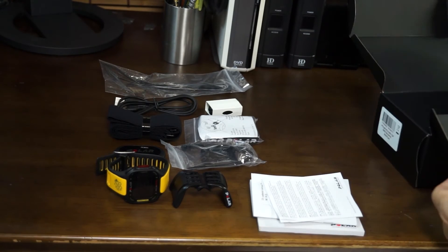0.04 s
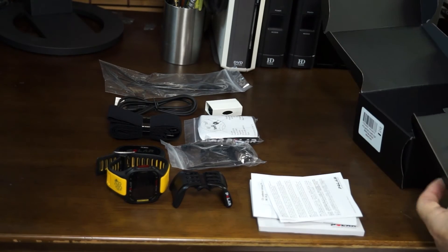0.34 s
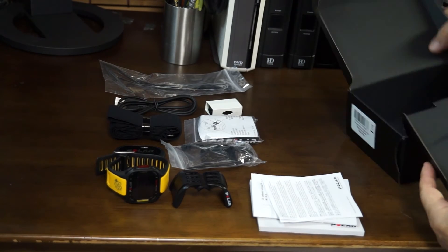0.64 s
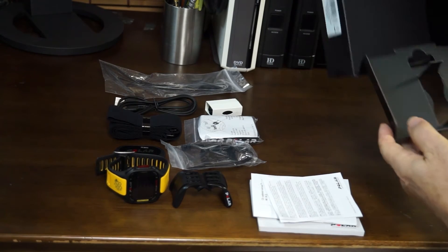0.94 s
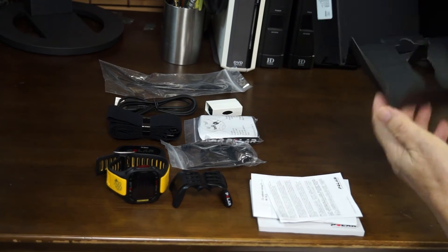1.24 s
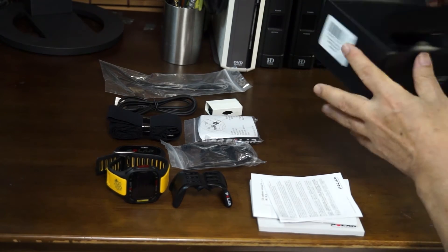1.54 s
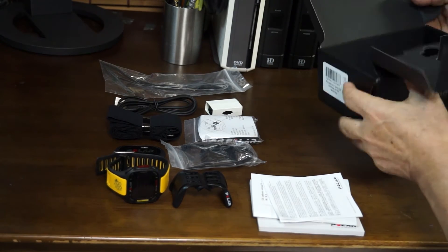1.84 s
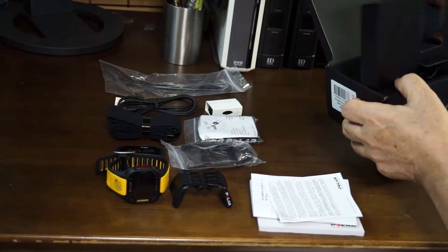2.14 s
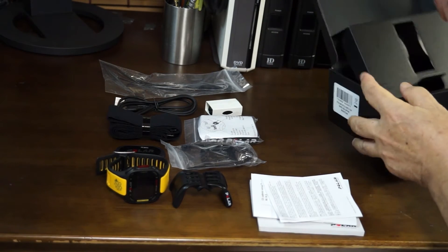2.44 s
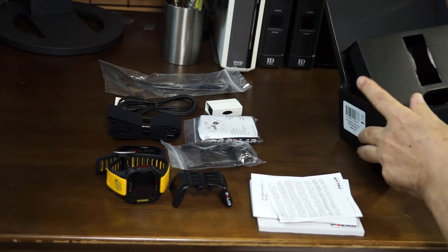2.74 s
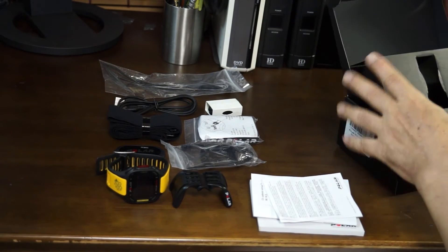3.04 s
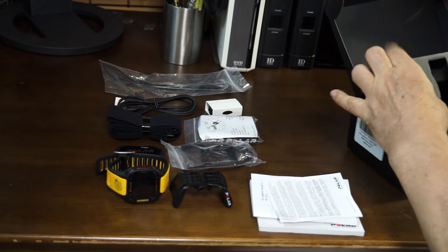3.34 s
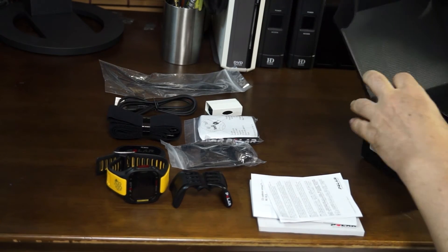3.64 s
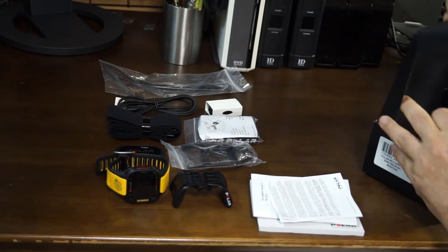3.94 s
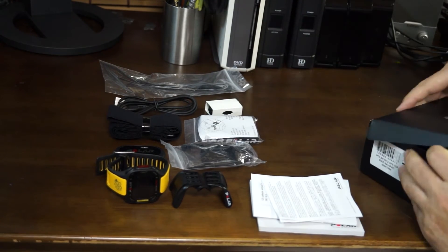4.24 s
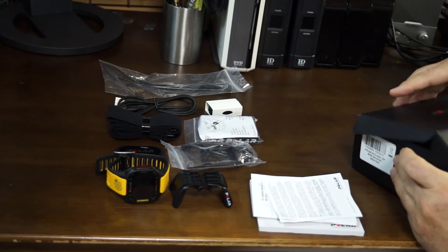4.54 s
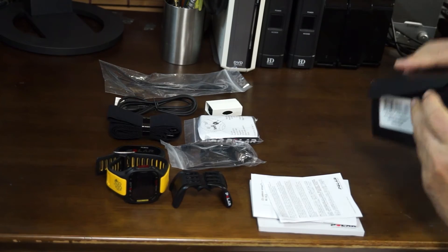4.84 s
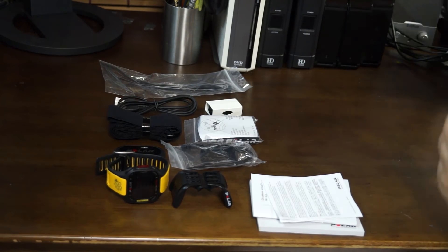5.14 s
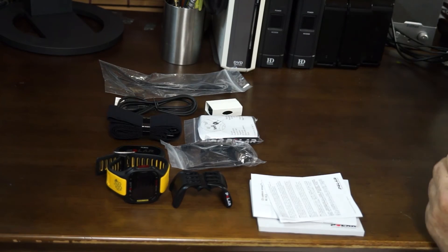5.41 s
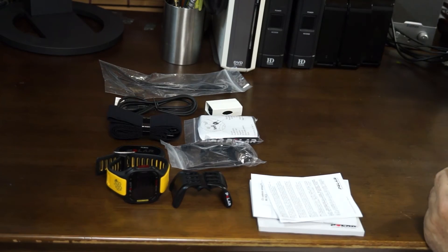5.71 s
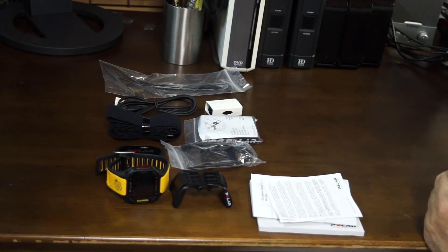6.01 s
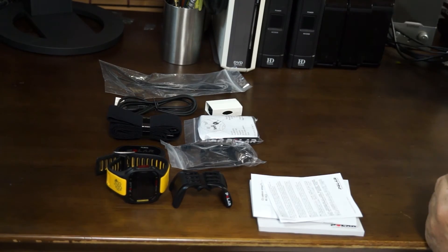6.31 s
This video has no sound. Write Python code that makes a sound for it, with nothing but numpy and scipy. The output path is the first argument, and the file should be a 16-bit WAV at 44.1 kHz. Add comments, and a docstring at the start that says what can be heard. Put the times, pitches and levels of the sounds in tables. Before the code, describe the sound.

Cardboard scrapes, taps and clicks as a box is packed with its insert and closed, followed by a soft slide with a brief squeak.

```python
"""Handling a cardboard box

Hands tilt a stiff box on a wooden desk, fit its insert back in, shut the lid and lift it away.
Impacts excite damped panel modes (knocks, snaps) and thump the desk; between them card and skin rub
in a stream of tiny slips. Last comes a soft slide with a short stick-slip hoot.
The room is small and dry; a close stereo microphone adds a faint hiss."""
import sys
import numpy as np
from scipy import signal
from scipy.fft import rfft, irfft, next_fast_len
from scipy.io import wavfile
from scipy.ndimage import map_coordinates

SR = 44100
rng = np.random.default_rng(int(sys.argv[2]) if len(sys.argv) > 2 else 0)


def master_out(mix):
    """Clip the mix to full scale and print it as 16-bit PCM to the path in sys.argv[1]."""
    frames = np.transpose(np.atleast_2d(mix))
    ceiling = np.clip(frames, -1, 1)
    pcm = np.round(ceiling * 32767).astype(np.int16)
    wavfile.write(sys.argv[1], SR, pcm)


N = 289718
TIME = np.arange(N) / SR

# room tone and microphone hiss: (frequency [Hz], spectral level [dB])
FLOOR_SPECTRUM = [(12, -32), (20, -4), (53, -13), (96, -6), (187, -7.5), (222, -2.5), (248, -8),
                  (422, -7.5), (459, -12.5), (574, -11.5), (1860, -23.5), (3250, -26), (3530, -25.5),
                  (16000, -30.5)]
# likeness of that noise in the two channels: (frequency [Hz], correlation [-1 to 1])
FLOOR_CORRELATION = [(30, .3), (130, -.4), (600, -0.37), (3000, 0), (7000, .3), (15000, .1)]
# card sliding on card, skin or desk:
# (start [s], duration [s], level [dB], pressure [dB], grit [dB], swell from start to end [dB])
RUB_STROKES = [(0.0, 0.19, -63, 2, -2.5, 4), (0.207, 0.076, -55.5, 1, 1, -0.5),
               (0.32, .18, -59, -3.5, -2.5, 0.5), (0.53, 0.049, -51.5, -6.5, -6, -1.5),
               (0.66, 0.13, -55.5, -1.5, -4.5, 13.5), (0.86, 0.09, -55.5, -5.5, -3.5, -3.5),
               (1.0, 0.061, -62, 0, 2, 3.5), (1.26, .16, -60, -2, -2, 8), (1.486, 0.015, -55.5, -8, -9, -6),
               (1.61, 0.17, -54, 1.5, -1, -9), (1.755, 0.18, -50.5, -5, -5.5, -13),
               (1.97, .08, -56.5, -4, 1, -9), (2.055, 0.1, -49.5, -7, -4.5, -8.5),
               (2.2, .19, -50, -5.5, -6, -3.5), (2.42, 0.28, -46.5, -4, -4.5, -5),
               (2.735, 0.048, -47, 1, 2, 4), (2.87, 0.14, -51.5, 6, 1, -6), (3.01, 0.15, -61.5, 5, 4, 6),
               (3.18, .13, -51, 7.5, -0.5, 2.5), (3.33, 0.12, -53.5, -0.5, -3.5, 11),
               (3.468, 0.16, -36.5, 2, -4, -0.5), (3.68, 0.19, -53.5, 0.5, -1.5, -0.5),
               (3.88, 0.32, -51, 3, -1.5, 1.5), (4.23, 0.21, -49.5, 1.5, -1.5, 10.5),
               (4.48, .12, -46.5, -4.5, -15, 2), (4.645, 0.12, -49.5, 6, -0.5, 3.5),
               (4.818, 0.17, -51.5, -3.5, -4.5, 11), (5.19, 0.13, -73, 8, 6, -8),
               (5.7, 0.073, -60, -0.5, -2, 7), (5.755, .13, -51.5, 1.5, -1, -0.5),
               (5.935, 0.16, -58.5, 3.5, -1, -9.5)]
# sliding friction: (frequency [Hz], spectral level [dB])
FRICTION_SPECTRUM = [(50, -7.5), (95, -19.5), (130, -8.5), (270, -8.5), (420, 4), (650, 1.5), (1000, -3),
                     (1600, -5), (2300, -4), (4000, -6.5), (5500, -9), (7500, -6), (10500, -9),
                     (13000, -15), (15500, -28.5)]
# resonances of box and desk: (frequency [Hz], level [dB])
MODES = [(128, -2), (195, 1), (255, -5.5), (310, -5.5), (357, 0.5), (400, 4.5), (463, 1), (545, 4),
         (624, 5), (709, 4.5), (830, 2), (899, 5), (1075, -26.5), (1150, -22), (1268, -23), (1380, 4),
         (1555, 7.5), (1790, 5), (1930, -25), (2288, -14.5), (2800, -5.5), (3750, -21)]
# panels and lid knock, and the desk takes their weight:
# (time [s], scuff time [ms], panel pitch [Hz], level [dB], hardness [dB], thump re level [dB])
PANEL_KNOCKS = [(0.028, 2, 350, -53, -6.5, 4.5), (0.242, 0.41, 369, -36, -10, -4),
                (0.272, 2.2, 315, -51, -17, 3), (0.412, 1.8, 516, -48.5, -5.5, 3.5),
                (0.63, .6, 880, -54.5, -7.5, -6), (0.693, 0.54, 371, -39.5, -36, -7.5),
                (0.799, 6.1, 381, -50.5, -5, -13), (1.607, 1.4, 656, -38.5, -6, -19),
                (1.699, 0.66, 656, -39.5, -3, -12), (1.728, 0.76, 666, -36, -8.5, -22),
                (2.081, 1.1, 640, -48, -14, -14), (2.716, 1.1, 590, -43, -8, -25),
                (2.764, 1.1, 426, -22, -12, -5.5), (2.874, 13, 624, -41.5, -6, -29),
                (2.923, 0.84, 787, -25.5, -10.5, -4.5), (2.936, 3.5, 890, -28.5, -6.5, -15),
                (2.951, 0.4, 429, -26, -5.5, -7), (3.116, 1.3, 520, -46, -16, -5.5),
                (3.177, 2.5, 485, -43.5, -3, -10), (3.214, 0.94, 352, -40, -5.5, -9),
                (3.283, 3, 595, -32, -5, -12), (3.297, 3.2, 423, -39, -8, -17),
                (3.476, 0.8, 920, -34.5, -10, -32), (3.626, 1.5, 450, -29.5, -0.5, -22),
                (3.638, 0.58, 864, -19, -5, -18.5), (3.644, 0.19, 429, -18.5, -2, -17.5),
                (3.673, 8.6, 1020, -33, -3, -26), (3.761, 0.6, 433, -36, -11, -16),
                (3.804, 0.52, 581, -29.5, -3, -18.5), (3.899, 7.6, 376, -36.5, -12, -7.5),
                (3.954, 0.96, 678, -35.5, -14, -12), (4.003, .53, 425, -41.5, -5, -9),
                (4.071, 1.4, 502, -36, -6.5, -9), (4.088, 0.94, 413, -31, -27, -5.5),
                (4.139, 2, 620, -40, -10.5, -22), (4.239, 0.36, 450, -39, -4, -9),
                (4.612, 4.1, 417, -34, -12, -15), (4.64, 0.89, 406, -48.5, -4, 9.5),
                (4.718, 0.38, 432, -30, -11, -1.5), (4.722, 0.81, 132, -41.5, -20, 10.5),
                (4.826, 1, 592, -53, -13, -10), (5.673, 3.2, 490, -55.5, -14.5, -24),
                (5.82, 4.5, 559, -44.5, -5.5, -10)]
# card edges catch and flick free: (time [s], panel pitch [Hz], level [dB], brightness [dB])
EDGE_SNAPS = [(0.243, 357, -48, 5), (1.244, 660, -60, 2), (1.314, 357, -64, 7.5), (1.366, 581, -47, -1.5),
              (1.689, 705, -42, 1), (1.88, 655, -44.5, 2), (1.908, 337, -45, 4.5), (1.933, 366, -44.5, 1.5),
              (2.001, 339, -57, 7.5), (2.194, 1030, -48.5, 6), (2.246, 660, -56.5, -7),
              (2.352, 769, -57.5, 10), (2.397, 365, -31.5, -4.5), (2.402, 349, -27, 0.5),
              (2.492, 1280, -44, -1.5), (2.546, 1250, -44.5, -1.5), (2.612, 1220, -41.5, -3.5),
              (2.952, 800, -36, -4.5), (3.262, 600, -49.5, 9.5), (3.525, 463, -43.5, 8.5),
              (3.555, 620, -38, 1.5), (3.58, 616, -35, 4), (4.225, 444, -47.5, -0.5),
              (4.288, 430, -43.5, 1), (4.473, 564, -45, -1), (4.765, 560, -54, -6), (4.872, 547, -46, -0.5),
              (4.889, 456, -42, -1.5), (4.92, 466, -39, -4.5), (4.951, 524, -38.5, -1),
              (4.996, 584, -48.5, -3), (5.087, 530, -60, -0.5)]
# the crowd of short-lived panel modes: (frequency [Hz], spectral level [dB])
PANEL_SPECTRUM = [(60, -35.5), (98, -24.5), (130, 2), (270, -11), (400, 7), (900, 1), (1550, 4), (2100, 2),
                  (3100, -9), (4200, -10), (6000, -16), (9000, -16), (12000, -22), (15500, -47)]
# sticking and slipping on the desk: (time [s], level [dB], pitch [Hz])
HOOT_CURVE = [(5.94, -75, 510), (5.975, -53, 510), (5.987, -42, 515), (5.996, -40, 520), (6.01, -46, 528),
              (6.03, -56, 540), (6.085, -64, 540), (6.13, -78, 544)]
# partials of the hoot: (frequency ratio [1], level [dB])
HOOT_SPECTRUM = [(1, 0), (1.8, -22)]
# the box sounds a little louder on the right; the recorder's stereo processing shifts the phase
# between the channels: (frequency [Hz], left minus right [dB], left phase lead [rad])
CHANNEL_DIFFERENCES = [(60, -1.5, -.2), (130, -2.4, -.65), (260, -2.8, -.6), (600, -4.3, -.62),
                       (1200, -3.8, -.25), (2400, -2.3, -.05), (5000, -2.2, -.15), (9000, -.5, -.35),
                       (14000, 0, -.9)]
# boundaries between the four registers: (frequency [Hz])
REGISTER_EDGES = [280, 1100, 3200]


def from_db(db):
    """A level in decibels is a logarithmic amplitude ratio."""
    return 10 ** (np.asarray(db) / 20)


def unit_rms(x):
    """Normalisation to a mean power of 1."""
    return x / np.sqrt(np.mean(x ** 2) + 1e-20)


def at_hz(table, hz, column=1):
    """Interpolation of one column on a logarithmic frequency axis."""
    table = np.array(table)
    return np.interp(np.log(hz + 1e-3), np.log(table[:, 0]), table[:, column])


def bin_gains(spectrum, size):
    """Magnitude response of a spectrum table at the bins of a Fourier transform."""
    return from_db(at_hz(spectrum, np.fft.rfftfreq(size, 1 / SR)))


def coloured_noise(spectrum, size):
    """Spectral shaping of white noise, at unit rms."""
    padded = next_fast_len(size, True)
    white = rfft(rng.standard_normal(padded))
    return unit_rms(irfft(white * bin_gains(spectrum, padded), padded)[:size])


def flutter(rate_hz):
    """Random modulation at unit rms, interpolated between rate_hz values a second."""
    return unit_rms(np.interp(TIME * rate_hz, np.arange(N), rng.standard_normal(N)))


def registers(lowest_hz):
    """A band-pass filter bank divides a sound into four registers, low to high."""
    edges = [lowest_hz, *REGISTER_EDGES, 17000]
    return [signal.butter(3, band, "band", fs=SR, output="sos") for band in zip(edges, edges[1:])]


def room_tone(level_db=-61):
    """Stationary air noise and hiss: the ratio of side to mid sets the correlation of the channels."""
    padded = next_fast_len(N, True)
    mid, side = (rfft(coloured_noise(FLOOR_SPECTRUM, padded)) for _ in range(2))
    correlation = at_hz(FLOOR_CORRELATION, np.fft.rfftfreq(padded, 1 / SR))
    side *= np.sqrt((1 - correlation) / (1 + correlation))
    return from_db(level_db) * irfft(np.array([mid + side, mid - side]), padded)[:, :N]


def stroke_gains(attack_s=0.007, release_s=0.023, rumble_db=-4.5, rumble_follows=0.77, usual_db=-50.5):
    """Incoherent strokes add in power, giving the envelopes of rumble, body, rasp and hiss."""
    power = np.zeros((4, N))
    for start, duration, level_db, pressure_db, grit_db, swell_db in RUB_STROKES:
        first = int(start * SR)
        t = TIME[first:first + int((duration + .3) * SR)] - start
        envelope = np.clip(t / attack_s, 0, 1) * np.exp(-np.maximum(t - duration, 0) / release_s)
        envelope *= from_db(level_db + swell_db * (np.minimum(t / duration, 1) - .5))
        # rumble comes from pressure and only partly follows the stroke's level
        low_db = rumble_db + pressure_db - (1 - rumble_follows) * (level_db - usual_db)
        balance = from_db([low_db, pressure_db, grit_db, 0])
        power[:, first:first + len(t)] += np.outer(balance, envelope) ** 2
    return np.sqrt(power)


def moving_contact(x, rate_hz=26, depth_db=2.4, bands=56):
    """Excitation depends on position: as the contact travels, narrow resonances swell and fade."""
    hz, times, frames = signal.stft(x, SR, nperseg=512)
    band = np.interp(np.log(hz + 1), np.log([250, 14000]), [0, bands - 1])
    turns = np.clip(rng.standard_normal((bands, int(times[-1] * rate_hz) + 2)), -2, 2)
    grid = np.meshgrid(band, times * rate_hz, indexing="ij")
    gains = map_coordinates(from_db(depth_db * turns), grid, order=1, mode="nearest")
    return signal.istft(frames * gains, SR)[1][:N]


def mode_t60(hz):
    """Damping in cardboard is heavy and rises with frequency; seconds to decay by 60 dB."""
    return .1 * (hz / 400) ** -.2


def box_resonance(x, direct_gain=0.98):
    """Forced vibration: friction drives each mode of the box as a two-pole resonator."""
    out = direct_gain * x
    for k, (hz, db) in enumerate(MODES):
        radius = from_db(-60 / (mode_t60(hz) * SR))
        numerator = np.array([1, 0, -1]) * (1 - radius ** 2) / 2
        denominator = [1, -2 * radius * np.cos(2 * np.pi * hz / SR), radius ** 2]
        out += (-1) ** k * from_db(db) * signal.lfilter(numerator, denominator, x)
    return out


def rubbing(slips_per_s=1900, slip_spread_db=1.5, smooth_db=4.5, judder_db=2.0, gain_db=-1.93):
    """Friction noise: fibres catch and release at random, unevenly with the pressure of the hand."""
    sizes = from_db(slip_spread_db * np.minimum(rng.exponential(1, N), 4)) * rng.choice([-1, 1], N)
    slips = unit_rms(sizes * (rng.random(N) < slips_per_s / SR))
    force = slips + from_db(smooth_db) * rng.standard_normal(N)
    force = moving_contact(force * from_db(judder_db * flutter(rate_hz=110)))
    padded = next_fast_len(N, True)
    friction = irfft(rfft(force, padded) * bin_gains(FRICTION_SPECTRUM, padded), padded)[:N]
    vibration = box_resonance(friction)
    bands = [unit_rms(signal.sosfilt(sos, vibration)) for sos in registers(lowest_hz=50)]
    return from_db(gain_db) * np.sum(stroke_gains() * bands, axis=0)


def contacts():
    """Harder contact is brighter: (time [s], scuff [ms], pitch [Hz], thump, body, clack, crack [dB])."""
    for onset, scuff_ms, pitch_hz, db, hard_db, thump_db in PANEL_KNOCKS:
        yield onset, scuff_ms, pitch_hz, db + thump_db, db, db + hard_db, db + hard_db - 6
    for onset, pitch_hz, db, bright_db in EDGE_SNAPS:   # quick, and hardly moving the desk
        yield onset, 1, pitch_hz, db - 15, db - bright_db, db + 1.8, db + bright_db


def struck_spectrum(pitch_hz, hump_db=4.0, hump_octaves=.3, spread_db=2.5):
    """Point response of the card: a resonant hump at the panel's pitch, with chance peaks and dips."""
    hz = np.geomspace(40, 16000, 52)
    hump = hump_db * np.exp(-(np.log2(hz / pitch_hz) / hump_octaves) ** 2)
    ripple = spread_db * rng.standard_normal(len(hz))
    return np.column_stack([hz, at_hz(PANEL_SPECTRUM, hz) + hump + ripple])


def panel_ring(t, pitch_hz, spectrum, focus_db=18.0, focus_octaves=0.099, detune=0.0088,
               crowd_db=11.5, crowd_t60=0.12):
    """Free vibration: where the box is struck and held selects its modes and detunes them slightly."""
    hz, db = np.transpose(MODES)
    scatter_db, shift, polarity = rng.standard_normal((3, len(hz)))
    nearness = np.exp(-(np.log2(hz / pitch_hz) / focus_octaves) ** 2)
    gains = np.sign(polarity) * from_db(db + scatter_db + focus_db * nearness)
    sines = np.sin(2 * np.pi * (hz * (1 + detune * shift))[:, None] * t)
    build_up = 1 - np.exp(-2 * hz[:, None] * t)   # takes about half a cycle
    decay = from_db(-60 * t / mode_t60(hz)[:, None])
    crowd = coloured_noise(spectrum, len(t)) * from_db(crowd_db - 60 * t / crowd_t60)
    return gains @ (sines * build_up * decay) + crowd


def impact_pulse(spectrum, size):
    """A minimum-phase pulse of unit energy packs the spectrum into the first instant of a blow."""
    padded = next_fast_len(2 * size, True)
    cepstrum = irfft(np.log(bin_gains(spectrum, padded)), padded)
    causal = np.concatenate([[0], 2 * cepstrum[1:size]])
    pulse = irfft(np.exp(rfft(causal, padded)), padded)[:size]
    return pulse / np.linalg.norm(pulse)


def knocks_and_snaps(hit_db=38.5, softening_db_per_ms=4.0, snap_db=20.0, snap_t60=0.026, scuff_db=13.5):
    """Impact excitation: each contact scuffs, hits, snaps for an instant and leaves the panels ringing."""
    out = np.zeros(N + SR)
    t = np.arange(SR // 6) / SR
    lead, early = SR // 40, SR // 50   # samples before and just after the hit
    filters = registers(lowest_hz=116)
    yielding = signal.butter(2, 1700, fs=SR, output="sos")
    soft_edge = signal.butter(1, 7000, fs=SR, output="sos")
    for onset, scuff_ms, pitch_hz, *levels_db in contacts():
        scuff_s = scuff_ms / 1000
        spectrum = struck_spectrum(pitch_hz)
        ring = panel_ring(t, pitch_hz, spectrum)
        # dull or dragging contacts hardly snap
        _, body_db, _, crack_db = levels_db
        dull_db = 0.18 * min(crack_db - body_db, 0)
        snap_envelope = from_db(snap_db + dull_db - 60 * t / snap_t60) * np.exp(-scuff_s / 0.0011)
        snap = signal.sosfilt(soft_edge, snap_envelope * coloured_noise(spectrum, len(t)))
        # the edge drags in a swelling burst of tiny slips before it lands
        swell = np.exp(-np.arange(lead)[::-1] / (1.2 * scuff_s * SR + 1))
        scuff = from_db(scuff_db) * coloured_noise(spectrum, lead) * swell
        hit = from_db(hit_db - softening_db_per_ms * scuff_ms) * impact_pulse(spectrum, len(t))
        blow = np.concatenate([scuff, signal.sosfilt(yielding, hit) + ring + snap])
        start = max(round(onset * SR) - lead, 0)
        for sos, db in zip(filters, levels_db):
            band = signal.sosfilt(sos, blow)
            out[start:start + len(band)] += from_db(db) * band / np.std(band[lead:lead + early])
    return out[:N]


def hoot(waver=.025, roughness_db=2.4):
    """Stick-slip oscillation: for a moment the slips fall into step and sing, rising a little in pitch."""
    times, levels_db, pitches_hz = np.transpose(HOOT_CURVE)
    pitch_hz = np.interp(TIME, times, pitches_hz) * (1 + waver * flutter(rate_hz=120))
    phase = 2 * np.pi * np.cumsum(pitch_hz) / SR
    tone = sum(from_db(db) * np.sin(ratio * phase) for ratio, db in HOOT_SPECTRUM)
    rough_tone = unit_rms(tone * from_db(roughness_db * flutter(rate_hz=90)))
    sliding = (TIME > times[0]) & (TIME < times[-1])
    return sliding * from_db(np.interp(TIME, times, levels_db)) * rough_tone


def stereo_pickup(x):
    """Interchannel differences: a little louder on the right; the recorder's processing shifts phase."""
    padded = next_fast_len(N + SR // 10, True)
    hz = np.fft.rfftfreq(padded, 1 / SR)
    left_db, left_rad = (at_hz(CHANNEL_DIFFERENCES, hz, column) for column in (1, 2))
    left = from_db(left_db / 2) * np.exp(.5j * left_rad)
    return irfft(rfft(x, padded) * np.array([left, 1 / left]), padded)[:, :N]


def early_reflections(x, level_db, paths=3):
    """Scattering from moving hands and lid comes and goes, decorrelating the two channels."""
    spectrum = [(100, -16), (600, -8), (1100, -9), (2000, -4),
                (4200, -8), (8000, -4), (13000, 0), (18000, -2)]
    small_surfaces = signal.butter(1, 400, "high", fs=SR, output="sos")
    scattered = signal.sosfilt(small_surfaces, x)
    side = np.zeros(N)
    for _ in range(paths):
        path = coloured_noise(spectrum, SR // 400)
        side += signal.oaconvolve(scattered, path / np.linalg.norm(path))[:N] * flutter(rate_hz=45)
    return from_db(level_db) * np.array([side, -side]) / np.sqrt(paths)


def reverberation(x, level_db, t60, delay_s=.004):
    """A diffuse field decays exponentially, with an independent tail in each channel."""
    t = np.arange(SR // 4) / SR
    spectrum = [(100, -8), (500, -4), (2000, 0), (5000, -1), (13000, -2)]
    decay = from_db(-60 * t / t60) * (t > delay_s)
    tails = [coloured_noise(spectrum, len(t)) * decay for _ in range(2)]
    channels = [signal.oaconvolve(x, tail / np.linalg.norm(tail))[:N] for tail in tails]
    return from_db(level_db) * np.array(channels)


def scene():
    """Superposition of the box's direct sound, its reflections and the room tone."""
    box = knocks_and_snaps() + rubbing() + hoot()
    near = early_reflections(box, level_db=-6.0)
    return stereo_pickup(box) + near + reverberation(box, level_db=-16.5, t60=.21) + room_tone()


def record(dry, cutoff_hz=15900):
    """Band limiting: an elliptic low-pass cuts the highest treble steeply."""
    return signal.sosfilt(signal.ellip(10, .2, 70, cutoff_hz, fs=SR, output="sos"), dry)


dry = scene()
out = record(dry)
master_out(out)
```